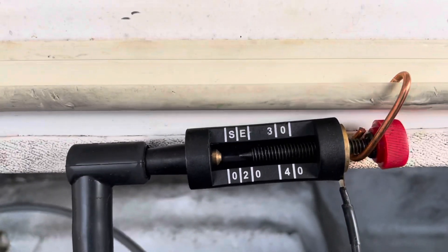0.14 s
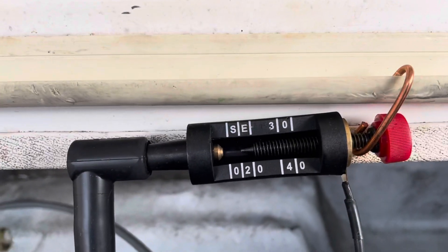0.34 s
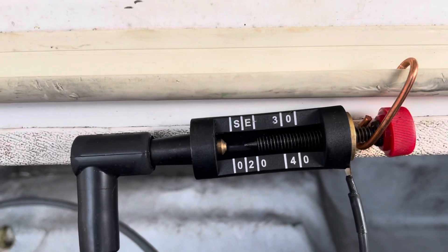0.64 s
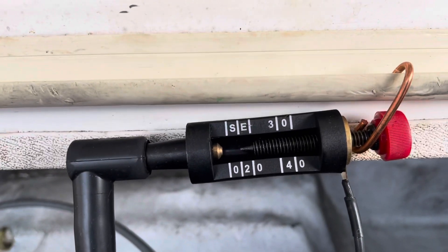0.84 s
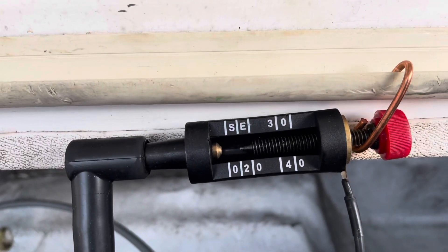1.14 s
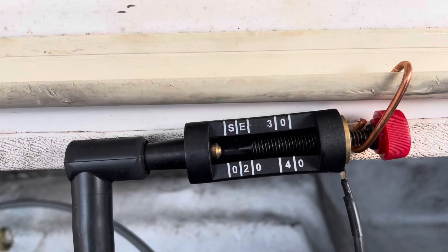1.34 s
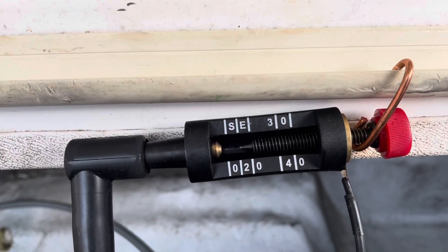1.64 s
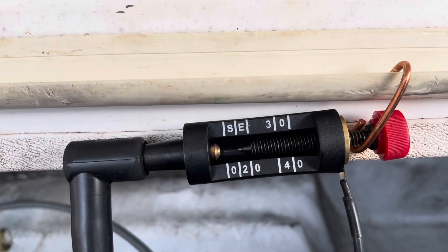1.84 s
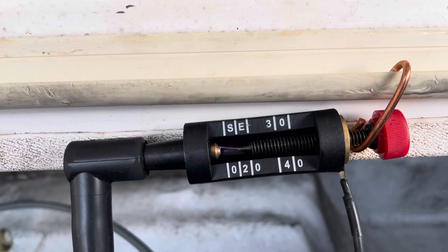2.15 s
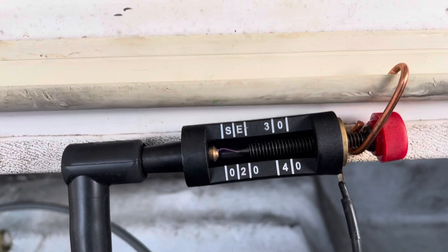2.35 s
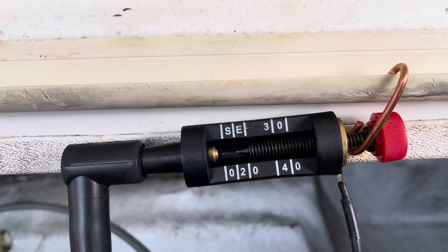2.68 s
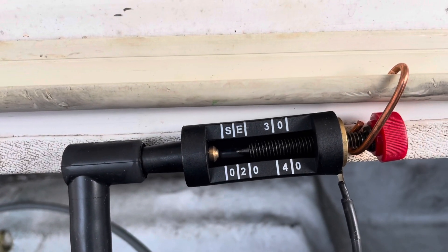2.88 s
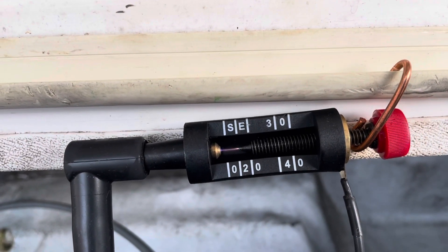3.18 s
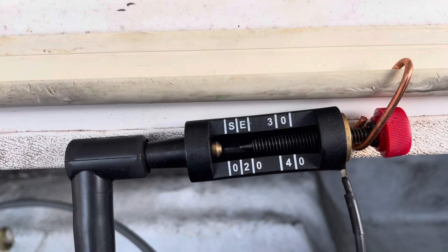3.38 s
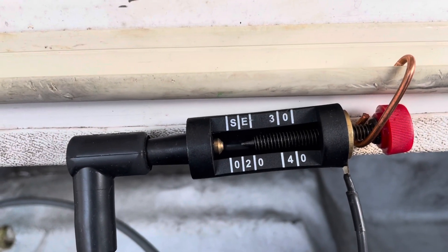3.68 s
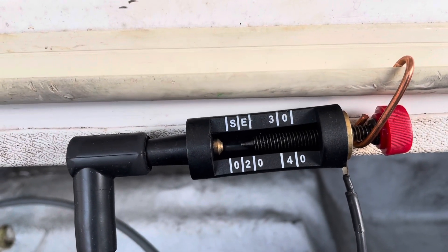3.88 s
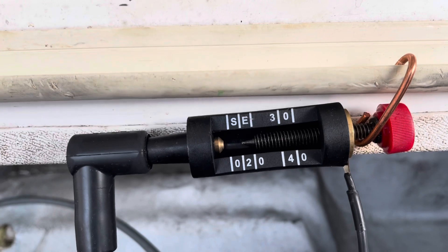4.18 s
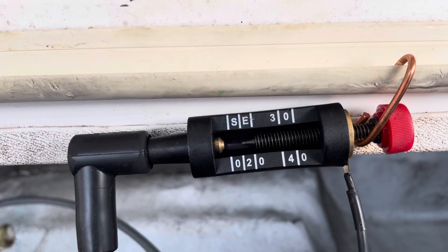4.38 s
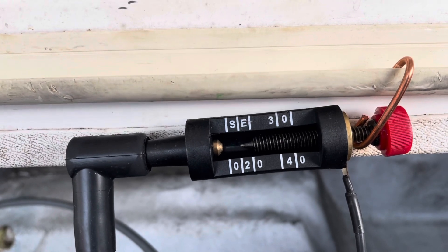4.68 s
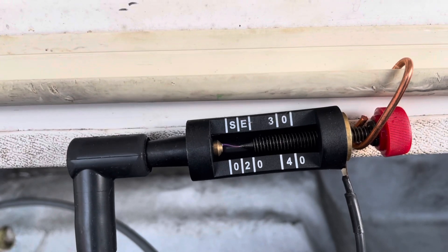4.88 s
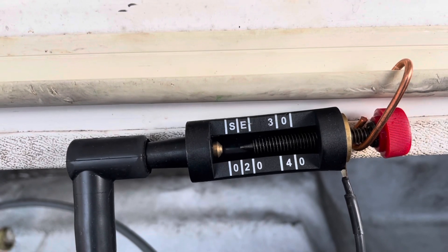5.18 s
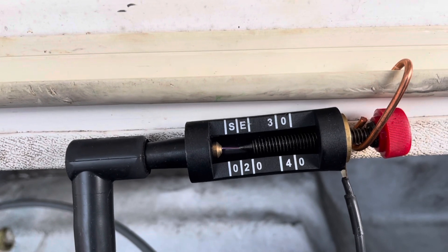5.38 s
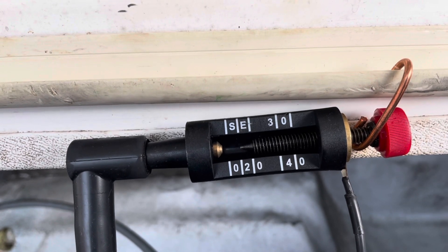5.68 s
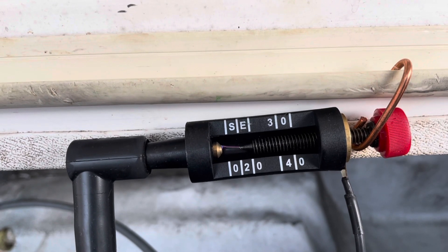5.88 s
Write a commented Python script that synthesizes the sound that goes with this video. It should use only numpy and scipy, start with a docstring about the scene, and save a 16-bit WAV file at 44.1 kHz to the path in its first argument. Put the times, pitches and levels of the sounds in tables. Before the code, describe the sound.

From 0 s a spark tester close to the stereo microphones ticks sharply and evenly at roughly forty-six times a second, a bright, dry crackling buzz with small differences between snaps. An idling engine lies behind: low boom, wavering hum around 180 Hz, soft growl and a broad hiss ringing in metalwork, its speed drifting slightly up and dropping back. At first the ticks are mostly plain; from about 0.65 s hard electrical pops ride on many of them, strongest around 0.7-1.3 s with bassy thumps, then irregular and somewhat thinner until 2.8 s. Between 2.8 and 4.3 s pops are sparser, with a cluster near 3.5 s. More groups come around 4.3-4.7 s and 5.1-5.4 s, and one near 6 s. Very short cover rattles, slightly louder on the right, flick by at about 0.3, 0.6, 2, 3.2-3.4, 4.2, 4.9 and 5.6 s. Everything continues to the cut at 6 s.

```python
"""A spark tester close to the microphones fires on every ignition pulse of a small inboard engine in its bay.
Each spark is a sharp filtered tick. On some, the recorder's electronics are jolted hard as well: their
filters smear a voltage step into a falling pop. On the other sparks the jolt is faint.
Behind lie brief rattles of a cover (rough noise), the boom of the bay and a growl (filtered noise),
a wavering hum (tones tied to engine speed) and a bright hiss ringing in the metalwork (shaped noise)."""
import sys
import numpy as np
from scipy import signal
from scipy.fft import rfft, irfft
from scipy.io import wavfile
from scipy.ndimage import uniform_filter1d

SR = 44100
rng = np.random.default_rng(int(sys.argv[2]) if len(sys.argv) > 2 else 0)


def voltage_ratio(decibels):
    """Convert decibels (scalar or array-like) to amplitude ratios, 20 dB per decade."""
    exponent = np.asarray(decibels, float) / 20
    return 10 ** exponent


def materialize(psi):
    """Save the field psi as 16-bit PCM at rate SR to the path in sys.argv[1].

    A 1-D psi becomes a single channel; in a 2-D psi each row is a channel.
    """
    bounded = np.clip(np.atleast_2d(psi).T, -1, 1)
    quanta = np.round(bounded * 32767).astype(np.int16)
    wavfile.write(sys.argv[1], SR, quanta)


N = 265923  # length [samples]


def evened(x):
    """Scales a signal to rms 1."""
    return x / np.sqrt(np.mean(abs(x) ** 2) + 1e-20)


def read_spectrum(points, hz):
    """Reads a spectrum table between its points, on a log-frequency axis."""
    f, value = np.transpose(points)
    return np.interp(np.log(hz + 1), np.log(f + 1), value)


def read_time(points, t):
    """Reads a table of changes over time, in straight lines between its points."""
    return np.interp(t, *np.transpose(points))


def resonate(x, hz, width):
    """Steep resonance: shifts the pitch down to zero, smooths twice, shifts back."""
    turn = np.exp(2j * np.pi * hz * np.arange(len(x)) / SR)
    r = np.exp(-np.pi * width / SR)
    once = signal.lfilter([1 - r], [1, -r], x / turn)
    twice = signal.lfilter([1 - r], [1, -r], once)
    return (turn * twice).real


# Hiss common to both channels, before its overall level is set: (frequency [Hz], relative level [dB])
SHARED_HISS = [(80, -17.5), (115, -37), (145, -6), (185, -6), (260, -8.5), (400, -23), (660, -15.5),
               (830, -22), (1100, -13.5), (1800, -19.5), (2450, -21.5), (3000, -20), (3600, -19),
               (6200, -15), (7500, -16.5), (7700, -44), (8500, -39), (8800, -20), (9300, -25), (13300, -24),
               (13700, -38), (14000, -53), (16000, -36)]
# Hiss opposite in the two channels, likewise: (frequency [Hz], relative level [dB])
OPPOSED_HISS = [(120, -32), (250, -28), (426, -20), (594, -6.5), (676, -4), (799, -4), (961, 0), (1940, -1),
                (2130, 0), (3250, -6.5), (6500, 0.5), (7500, 4), (8300, 7.5), (9000, 4.5), (9400, -4),
                (10100, -8), (10500, -25), (11000, -30), (11800, -28), (12500, -14), (14500, -1.5),
                (15300, 4.5), (16500, -20)]
# How alike the shared and opposed hiss are: (frequency [Hz], likeness [-1 to 1])
LIKENESS = [(400, 0.22), (750, 0.52), (1200, 0.023), (1800, -0.21), (2600, 0.33), (4700, 0.43),
            (5400, 0.39), (6000, 0.01)]
# Ringing of pipes and covers; a negative lift is a dip: (frequency [Hz], width [Hz], lift [dB])
RINGS = [(820, 180, -3), (1093, 41, 1.5), (1300, 44, -0.5), (1783, 146, 6.5), (2630, 95, -5),
         (2985, 196, 7), (3385, 37, 8.5), (3670, 127, -12), (3738, 53, 9), (3920, 50, -5), (3927, 104, 6.5),
         (4137, 106, 9), (4450, 100, 6.5), (4400, 63, -11), (4742, 130, 10), (5050, 43, 5.5),
         (5125, 60, 6.5), (5317, 64, 11), (5663, 76, 3.5), (5790, 79, -1), (5563, 39, 9), (6170, 67, 10.5),
         (6360, 84, 4), (9315, 147, 16.5), (9260, 70, -15), (10090, 145, 11), (10860, 410, 9),
         (11370, 100, 8.5), (11850, 110, 0), (11600, 300, 7), (11980, 100, 7), (12100, 150, 4),
         (12880, 110, 7)]
# The roar of the bay, the lower part of the hiss, rises and falls: (time [s], level [dB])
ROAR = [(0, 0.5), (.4, -1), (.8, 2), (1.5, 1), (2, 0.5), (2.5, 1.5), (3.1, 2), (3.9, 0.5), (4.8, 2),
        (5.5, 2), (6.03, -1)]


def hiss():
    """Random short-time spectra, shared and opposed, lifted where metal rings, with patches and flicker."""
    shared_db, opposed_db = -31, -32  # overall levels
    roar_hz, treble_hz = 2320, 9100.0
    opposed_ring_share, ring_waver = 0.92, 0.15
    frames, hz = N // 256 + 5, np.fft.rfftfreq(1024, 1 / SR)
    # every array of noise has frequency down and time across
    a, b, c, d, patches, flicker, gusts = rng.standard_normal((frames, 513, 7)).T
    patches = uniform_filter1d(patches, size=8, axis=0)
    patches = evened(uniform_filter1d(patches, size=10, axis=1))
    flicker = evened(uniform_filter1d(flicker, size=120, axis=0))
    rings_db = sum(db / (1 + (2 * (hz - f) / w) ** 4) for f, w, db in RINGS)
    roar_db = np.outer(1 / (1 + (hz / roar_hz) ** 4), read_time(ROAR, np.arange(frames) * 256 / SR))

    # the treble flickers as one, fast and slowly
    fast = evened(gusts[300:].sum(axis=0))
    slow = evened(uniform_filter1d(gusts[:300].sum(axis=0), size=20))
    treble_db = np.outer(hz ** 4 / (hz ** 4 + treble_hz ** 4), 1.1 * fast + .5 * slow)

    # each ring swells and fades by a share of its lift
    waver_db = ring_waver * rings_db[:, None] * np.roll(patches, shift=200, axis=1)
    shape = voltage_ratio(roar_db + treble_db + 1.7 * patches + 1.56 * flicker + waver_db)

    likeness = np.clip(read_spectrum(LIKENESS, hz), -1, 1)[:, None]
    shared = a + 1j * b
    opposed = likeness * shared + np.sqrt(1 - likeness ** 2) * (c + 1j * d)
    shared = shared * voltage_ratio(read_spectrum(SHARED_HISS, hz) + rings_db)[:, None]
    opposed = opposed * voltage_ratio(read_spectrum(OPPOSED_HISS, hz) + opposed_ring_share * rings_db)[:, None]
    spectra = np.array([shared, opposed]) * shape
    shared, opposed = signal.istft(spectra, nperseg=1024, noverlap=768)[1][:, :N]
    shared, opposed = voltage_ratio(shared_db) * evened(shared), voltage_ratio(opposed_db) * evened(opposed)
    return np.array([shared + opposed, shared - opposed])


# Engine speed, rising and dropping: (time [s], speed [rpm])
SPEED = [(0, 910.3), (.9, 960.3), (1.89, 913.4), (1.94, 878.5), (2.53, 951.6), (2.57, 913), (3.14, 951.2),
         (3.86, 948.3), (3.88, 928), (4.28, 931.2), (4.69, 949.8), (4.85, 912), (5.11, 918.5),
         (5.47, 955.8), (5.9, 964.4), (6.03, 930.5)]


def fired():
    """Counts the sparks fired so far by adding up the engine speed."""
    sparks_per_turn, first_spark_s = 3, .0204  # six cylinders, four strokes
    t = np.arange(N) / SR
    rate = read_time(SPEED, t) * sparks_per_turn / 60  # sparks per second
    count = np.cumsum(rate) / SR
    return count - np.interp(first_spark_s, t, count)


# Swell of the low end, which each part of the drone follows by its own factor: (time [s], level [dB])
LOW_SWELL = [(0, -11.5), (0.349, -6.5), (.57, 2), (1.1, -19), (1.7, -11.5), (2.4, -0.5), (3, -1),
             (4.1, 1.5), (5.05, -0.5), (6.03, -3)]
# Fainter tones tied to engine speed: (pitch [cycles per spark], level against the hum [dB])
FAINT_TONES = [(3, -11), (5.5, -16), (7.74, -21), (9.5, -19), (14, -20)]


def drone():
    """Firing tone in a low boom, a hum tied to engine speed and a broad growl, the same in both channels."""
    hum_order = 3.87  # hum cycles per spark, from a belt-driven part
    swell_db = read_time(LOW_SWELL, np.arange(N) / SR)
    # dB at no swell, then dB per dB of the swell
    boom_gain = voltage_ratio(-44 + 0.23 * swell_db)
    hum_gain = voltage_ratio(-36 + 0.74 * swell_db)
    growl_gain = voltage_ratio(-46 + 1.4 * swell_db)
    turns = 2 * np.pi * fired()
    boom_noise, waver_noise, growl_noise, blur_noise = rng.standard_normal((4, N))

    waver = evened(resonate(waver_noise, 0, 8.5))
    blur = evened(resonate(blur_noise, 0, 33))
    hum = np.cos(hum_order * turns) * voltage_ratio(1.0 * waver)
    hum = hum + voltage_ratio(-16) * blur * np.sin(hum_order * turns)
    for order, db in FAINT_TONES:
        own_waver = np.roll(waver, shift=round(order * SR))  # the same waver at another time
        hum = hum + voltage_ratio(db + 2.46 * own_waver) * np.cos(order * turns)

    boom = voltage_ratio(2.0) * np.cos(turns) + evened(resonate(boom_noise, hz=61.5, width=45))
    low_cut = signal.butter(3, 150, 'high', fs=SR, output='sos')
    growl = evened(resonate(signal.sosfilt(low_cut, growl_noise), hz=344, width=500))
    return boom_gain * boom + hum_gain * evened(hum) + growl_gain * growl


# A loose cover rattles briefly, level as on the left: (start [s], length [s], level [dB])
RATTLES = [(0.322, .04, -43), (0.627, 0.038, -41), (1.969, 0.036, -38), (3.19, 0.032, -43),
           (3.366, 0.054, -40), (3.835, 0.029, -45), (4.16, 0.037, -41), (4.73, 0.031, -44),
           (4.936, .04, -40.5), (5.565, 0.035, -42.5), (5.785, 0.027, -50), (5.968, 0.024, -36)]


def rattles():
    """Short bursts of rough noise in the ring of a sheet-metal cover."""
    right_db = 5.5  # louder on the right
    t = np.arange(N) / SR
    rough = rng.standard_normal(N) ** 3  # cubing makes the noise spiky
    ring = evened(resonate(rough, hz=1780, width=350))
    bursts = sum(voltage_ratio(db) * np.sin(np.pi * np.clip((t - s) / length, 0, 1)) for s, length, db in RATTLES)
    return ring * bursts * voltage_ratio(np.array([[0], [right_db]]))


# Strong electrical jolts that ride on a spark: (time [s], step height [dB], polarity [+1 or -1])
STRONG_JOLTS = [(0.3465, -16.5, -1), (.6445, -13, -1), (.6657, -6.5, 1), (0.6867, 2.5, -1),
                (.7078, -4.5, 1), (0.8131, -12.5, -1), (.855, -8.5, 1), (.8760, -1.3, -1), (.8968, 3, 1),
                (0.9177, 0, -1), (0.9594, -3, 1), (0.9806, -3.5, -1), (1.0426, -6.5, -1), (1.106, -10, 1),
                (1.127, 0.5, -1), (1.1479, 0.5, 1), (1.19, -1.5, -1), (1.2111, -2, 1), (1.275, -1.5, 1),
                (1.2963, -5, -1), (1.403, -10.5, 1), (1.4239, -8.5, -1), (1.4886, -4.5, 1),
                (1.5315, -10.5, -1), (1.553, -5.5, 1), (1.5745, -8.5, -1), (1.7263, -9, -1),
                (1.7702, -6.5, 1), (1.791, -4.5, -1), (1.8343, -4.5, 1), (1.856, -6.5, -1),
                (2.0133, -10.5, -1), (2.0349, -5, 1), (2.058, -10, -1), (2.08, -10.5, -1), (2.213, -10, 1),
                (2.235, -10, -1), (2.2568, -3.5, 1), (2.2784, -4, -1), (2.301, -10, 1), (2.3434, -6, -1),
                (2.3648, -11.5, 1), (2.429, -5.5, -1), (2.4504, -3.5, 1), (2.4714, -11, -1),
                (2.5139, -7, 1), (2.5351, -13, 1), (2.556, -19, -1), (2.6439, -4, -1), (2.6656, -17, 1),
                (2.7306, -4.5, -1), (2.773, -10, 1), (2.7952, -8.5, -1), (3.0093, -14, -1), (3.22, -17, -1),
                (3.2619, -15, -1), (3.304, -12, -1), (3.4729, -12, -1), (3.4937, -6, -1), (3.5357, -13, 1),
                (3.557, -5, -1), (3.5994, -10, 1), (3.6413, -7, -1), (4.304, -8, -1), (4.4737, -11, -1),
                (4.4954, -9, 1), (4.5167, -5.5, -1), (4.559, -5, 1), (4.6014, -9.5, -1), (4.6857, -5, -1),
                (4.902, -15, -1), (5.1417, -13, -1), (5.1635, -8.5, -1), (5.2709, -4.5, -1),
                (5.2923, -6, 1), (5.314, -9, -1), (5.335, -14, -1), (5.3768, -8.5, 1), (5.3987, -6, -1),
                (5.524, -14, -1), (5.6077, -14.5, -1), (5.9835, -7.5, 1)]


def jolts():
    """Lists the strong jolts and a faint one, of random polarity, on each remaining spark."""
    faint_db, spread_db = -26.5, 2
    s = (np.flatnonzero(np.diff(np.floor(fired()))) + 1) / SR
    size, polarity = rng.standard_normal((len(s), 2)).T  # only the sign of the polarity counts
    faint = np.transpose([s, faint_db + spread_db * np.clip(size, -2, 2), polarity])
    # a strong jolt takes the place of the nearest faint one
    taken = abs(s[:, None] - np.transpose(STRONG_JOLTS)[0]).argmin(axis=0)
    return np.vstack([STRONG_JOLTS, np.delete(faint, taken, axis=0)])


# Phase-turning stages, one row for left and one for right:
# (lowest [Hz], highest [Hz], low roll-off [Hz], lead [s], level [dB])
STAGES = [(38, 682, 72, .00018, 0), (40, 565, 61, .00022, -.7)]
# Where the recorder splits bass from treble: (time [s], frequency [Hz])
SPLIT = [(1.55, 318), (1.85, 590), (2.35, 720), (2.8, 880), (3.4, 1110), (6, 1230)]
# Bass kept in a pop before its strength counts; negative is upside down: (time [s], share)
THUMP = [(.35, 0.99), (.69, 0.97), (.96, 0.6), (1.13, 0.69), (1.3, 0.66), (1.55, 0.45), (1.772, 0.5),
         (1.788, -0.44), (2.1, -0.36), (2.3, -0.5), (2.5, -0.59), (2.75, -0.25), (3, 0.16)]


def pops(rows):
    """A voltage step passes a chain of all-pass stages: the treble comes out first, the bass last."""
    bass_per_db, edge_hz = 0.24, 6200  # dB more bass per dB of jolt
    hz, out = np.fft.rfftfreq(4096, 1 / SR), np.zeros((2, N + 4096))
    chain = []
    for low_hz, high_hz, roll_hz, lead, db in STAGES:
        step = SR / (2 * np.pi) * 1j * hz / (1j * hz + roll_hz) ** 2
        centres = np.geomspace(low_hz, high_hz, num=8)
        turns = np.prod([(p - 1j * hz) / (p + 1j * hz) for p in centres], axis=0)
        chain.append(voltage_ratio(db) * step * turns * np.exp(2j * np.pi * hz * lead))
    edge_limit = 1 / (1 + (hz / edge_hz) ** 5)
    channel_tilt = voltage_ratio(np.outer([0, -3], hz / (hz + 1500)))  # duller on the right
    for s, db, polarity in rows:
        bass = read_time(THUMP, s) * voltage_ratio(bass_per_db * db)
        treble = hz ** 4 / (hz ** 4 + read_time(SPLIT, s) ** 4)
        # the edge of the step is sharpened, less in pops rich in bass
        sharpening = np.sqrt(1 + np.clip(1 - bass, 0, 1) * (hz / 2500) ** 2)
        crack = sharpening * edge_limit * channel_tilt
        # with upside-down bass the phase turns through the split, leaving no gap
        bridge = -2.2j * np.clip(-bass, 0, 1) * np.sqrt(treble * (1 - treble))
        kept = treble * crack + bridge + bass * (1 - treble)
        pop = np.roll(irfft(np.array(chain) * kept), shift=256, axis=1)
        start = round(s * SR) - 256
        out[:, start:start + 4096] += np.sign(polarity) * voltage_ratio(db) * pop
    return out[:, :N]


# Colour of one spark tick: (frequency [Hz], relative level [dB])
TICK = [(500, -20), (1400, -15), (2400, -9), (3600, -11), (4800, -1), (5700, 0), (6500, 5), (7300, 2),
        (8300, 0.5), (9200, -3.5), (9900, -13.5), (10900, -7), (12000, -12), (13300, -14.5), (14800, -9),
        (15600, -10), (16300, -30)]
# How far the right channel is ahead of the left in the tick: (frequency [Hz], phase lead [degrees])
RIGHT_LEAD = [(1000, 30), (3000, 65), (4400, 50), (6600, 64), (7250, 102), (7900, 162), (8600, 194),
              (9600, 240), (10100, 310), (11300, 360), (12500, 400), (13400, 480), (14200, 505),
              (15500, 525)]
# Strength of the ticks, slowly varying: (time [s], level [dB])
TICK_STRENGTH = [(0, -0.5), (2.75, -0.5), (2.85, 2.5), (3.05, 1.5), (3.2, -1), (4.2, 0.5), (4.7, -1),
                 (6.03, 1)]


def sparks(times):
    """A sharp tick and a near echo at each ignition pulse, as each arc differs in strength and colour."""
    tick_db, spread_db = -.5, 1.9
    jolt_lag_s = .00007  # the jolt follows its tick
    again_s, again_share = .00012, .4  # part of the arc comes again, by a random share
    echo_s, echo_db = .0005, -13
    at = np.round(SR * (times - jolt_lag_s)).astype(int)
    train = np.zeros(N)
    size, colour = rng.standard_normal((len(at), 2)).T
    train[at] = voltage_ratio(tick_db + read_time(TICK_STRENGTH, times) + spread_db * size)
    again_at = np.minimum(at + round(again_s * SR), N - 1)
    train[again_at] = train[at] * again_share * np.clip(colour, -2, 2)

    # the phase that goes with the colour makes the tick start sharply
    hz = np.fft.rfftfreq(1024, 1 / SR)
    log_gain = np.log(voltage_ratio(read_spectrum(TICK, abs(np.fft.fftfreq(1024, 1 / SR)))))
    arc = np.exp(log_gain - 1j * signal.hilbert(log_gain).imag)[:513]
    arc = arc * (1 + voltage_ratio(echo_db) * np.exp(-2j * np.pi * hz * echo_s))
    half_lead = np.exp(.5j * np.radians(read_spectrum(RIGHT_LEAD, hz)))
    tick = np.roll(irfft(np.array([arc / half_lead, arc * half_lead])), shift=64, axis=1)
    peak = tick[0].argmax()
    return signal.oaconvolve(train[None], tick, axes=1)[:, peak:N + peak]


def scene():
    """Adds the engine noise, rattles, pops and spark ticks together."""
    rows = jolts()
    return hiss() + drone() + sparks(rows[:, 0]) + pops(rows) + rattles()


def top_cut(x):
    """Nothing passes above the cut-off."""
    return signal.sosfilt(signal.butter(12, 16730, fs=SR, output="sos"), x)


def record(dry):
    """The recorder cuts the lows under about 39 Hz and the treble steeply above 15.7 kHz."""
    hz = np.fft.rfftfreq(N, 1 / SR)
    low_cut = 1 / np.sqrt(1 + (39 / (hz + 1)) ** 8)
    band_limit = 1 / (1 + (hz / 15700) ** 300)
    mix = irfft(rfft(dry) * low_cut * band_limit, N)
    return top_cut(mix)


dry = scene()
out = record(dry)
materialize(out)
```